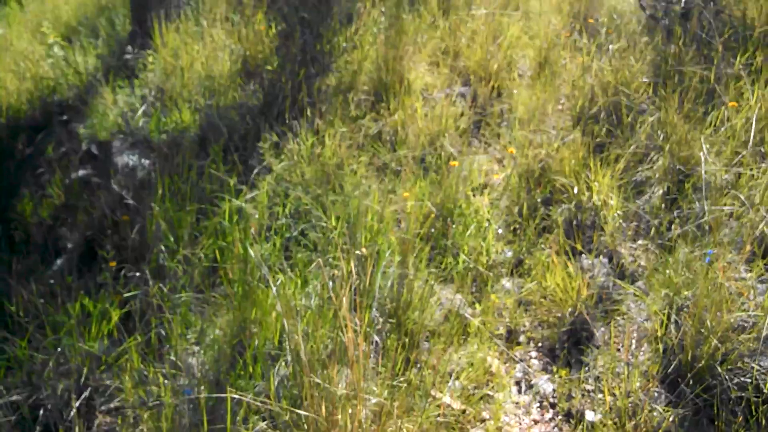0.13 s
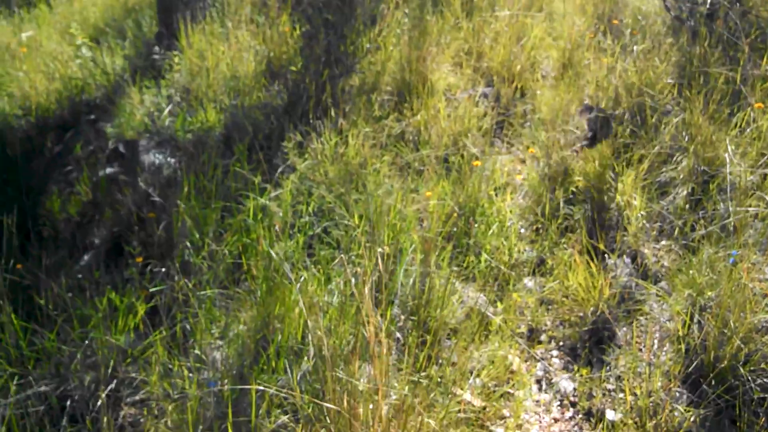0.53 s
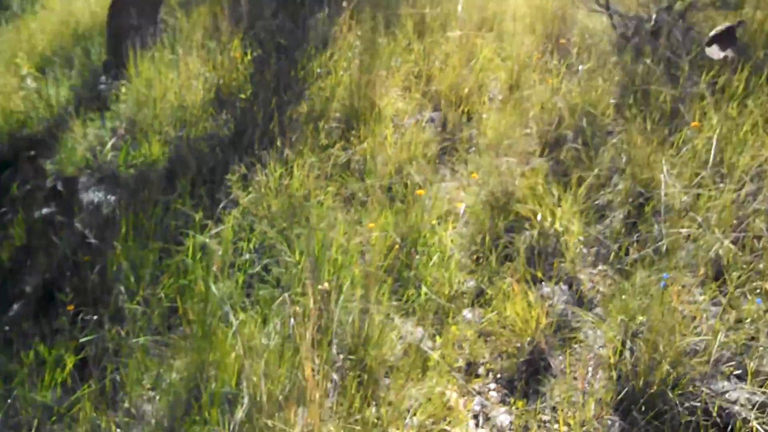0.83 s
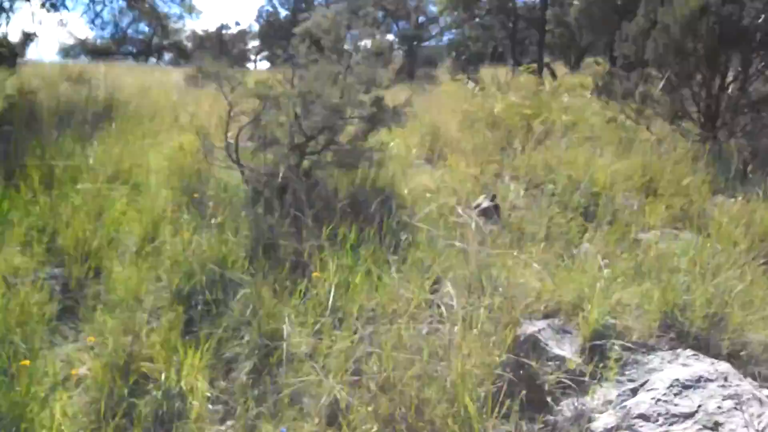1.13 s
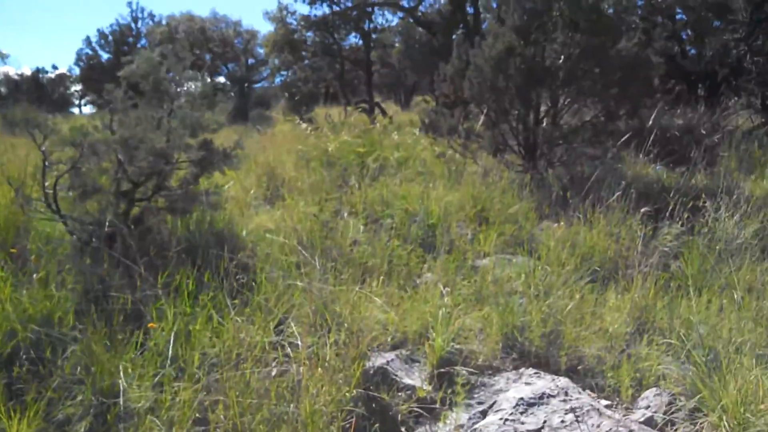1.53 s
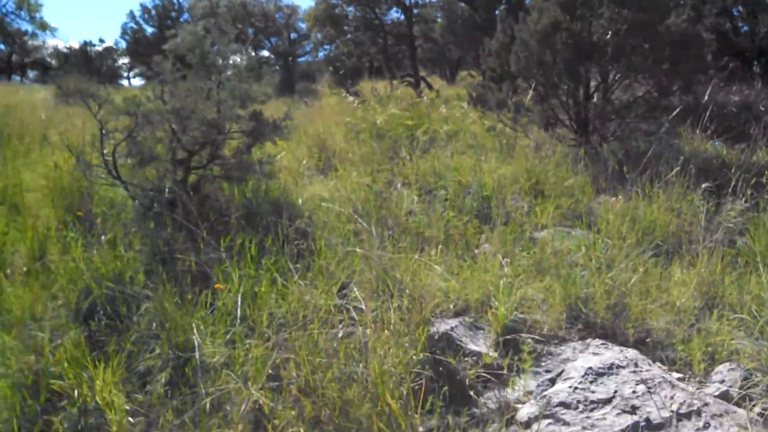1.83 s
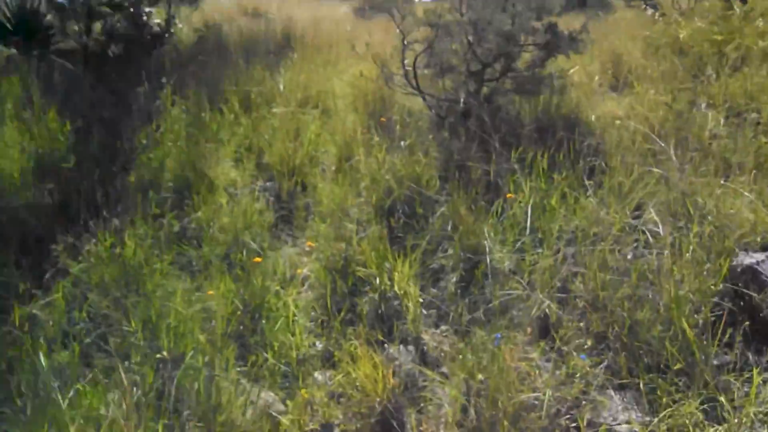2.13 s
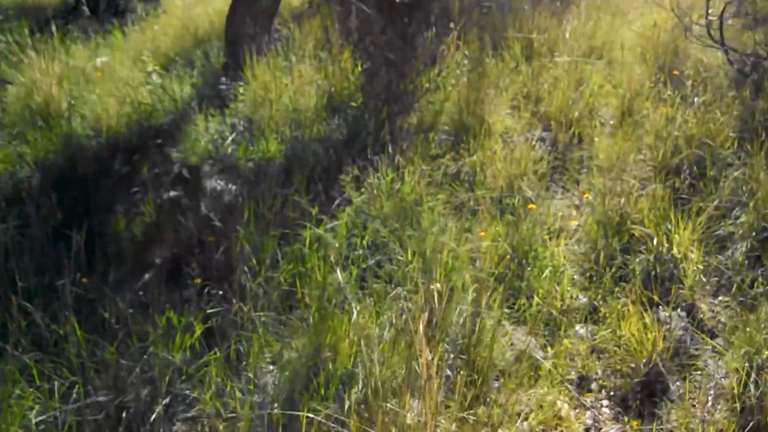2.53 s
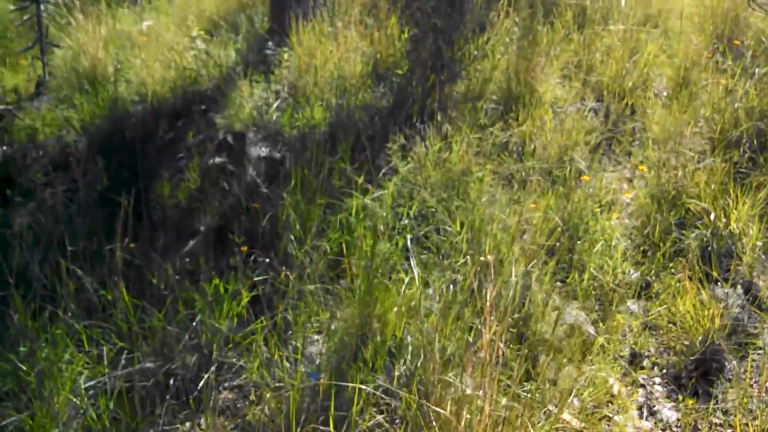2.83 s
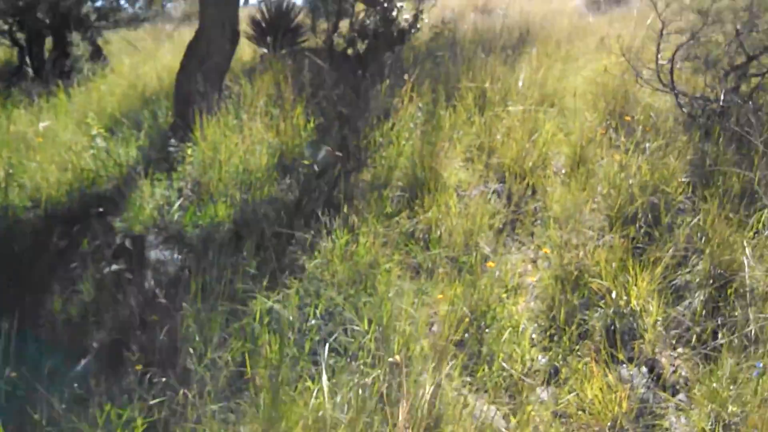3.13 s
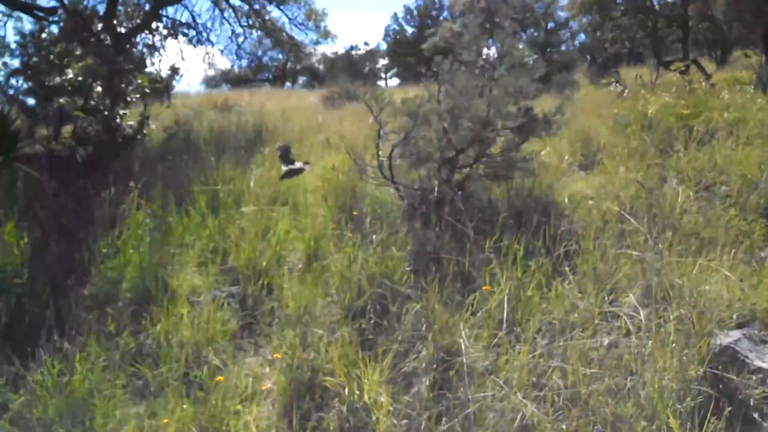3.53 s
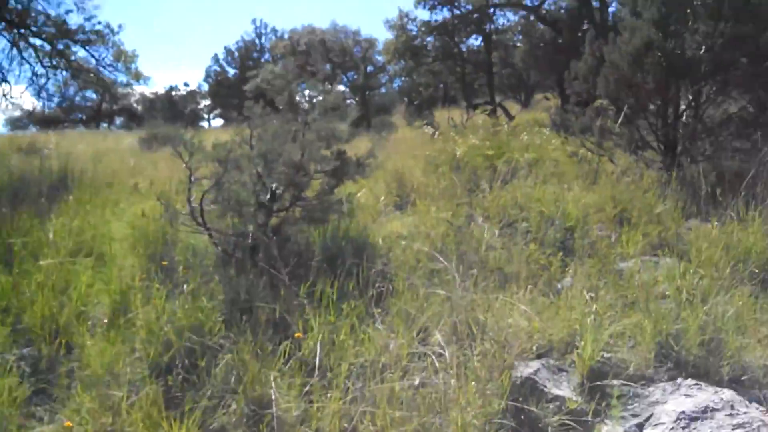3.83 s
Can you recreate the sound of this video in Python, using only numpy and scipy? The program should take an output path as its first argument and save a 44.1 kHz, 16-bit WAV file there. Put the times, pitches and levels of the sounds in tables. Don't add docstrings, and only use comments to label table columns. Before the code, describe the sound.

Rapid wing flapping thrashes dry grass twice, with young birds' falling whistles and low wind buffeting.

```python
import sys
import numpy as np
from scipy import signal
from scipy.fft import rfft, irfft, next_fast_len
from scipy.io import wavfile
from scipy.ndimage import uniform_filter1d, map_coordinates

SR = 44100
rng = np.random.default_rng(int(sys.argv[2]) if len(sys.argv) > 2 else 0)


def gain_from_db(level_db):
    decades = np.asarray(level_db, float) / 20
    return 10 ** decades


def inscribe(sig):
    pcm = np.round(np.clip(np.atleast_2d(sig).T, -1, 1) * 32767)
    wavfile.write(sys.argv[1], SR, pcm.astype(np.int16))


N = 176400


def unit(x):
    return x / np.sqrt(np.mean(x ** 2) + 1e-20)


def filtered(x, response):
    m = next_fast_len(N + 8192)
    return irfft(rfft(x, m) * response(np.fft.rfftfreq(m, 1 / SR)), m)[..., :N]


def noise(points, channels=2):
    f, db = np.transpose(points)
    white = rng.standard_normal((channels, N))
    return unit(filtered(white, lambda hz: gain_from_db(np.interp(np.log(hz + 1), np.log(f), db, left=-120))))


def wobble(knots_per_s):
    knots = rng.standard_normal(int(N * knots_per_s / SR) + 4)
    return map_coordinates(knots, [np.arange(N) * knots_per_s / SR])


def curve(rows):
    return np.interp(np.arange(N) / SR, *np.transpose(rows))


def add(track, start_s, sound):
    at = round(start_s * SR)
    track[..., at:at + sound.shape[-1]] += sound[..., :N - at]


SWOOP_RISE = 0.3


def swoop(hz, length_s, sag):
    u = np.arange(round(length_s * SR)) / (length_s * SR)
    rise = np.sin(np.pi / 2 * np.minimum(u / SWOOP_RISE, 1)) ** 2
    fall = np.cos(np.pi / 2 * np.maximum(u - SWOOP_RISE, 0) / (1 - SWOOP_RISE)) ** 2.2
    return rise * fall * np.sin(2 * np.pi * hz * length_s * (u - sag * u * u / 2))


# [f/Hz, level per Hz/dB]
HISS_SPECTRUM = [(150, 4), (1500, -16), (4000, -18.5), (6000, -24), (11000, -30), (15300, -15.5)]


def floor_hiss():
    return gain_from_db(-56) * noise(HISS_SPECTRUM)


# [t/s, level/dB]
WIND_STRENGTH = [(.28, -32), (.45, -27), (.6, -26), (1.25, -35), (1.6, -32), (1.72, -41), (1.85, -27.5),
                 (2.08, -44.5), (2.25, -23), (2.6, -35.5), (2.85, -25), (3.2, -32.5), (3.85, -32.5),
                 (4, -45.5)]
# [f/Hz, level per Hz/dB]
RUMBLE_SPECTRUM = [(25, -47), (45, 2), (70, 3.5), (120, -4), (200, -21.5), (400, -34.5), (900, -56.5)]


def wind_rumble():
    lumps = gain_from_db(2 * np.array([wobble(22.64), wobble(22.074)]))
    port_gain = gain_from_db([[-17], [0]])
    return gain_from_db(curve(WIND_STRENGTH)) * unit(lumps * noise(RUMBLE_SPECTRUM)) * port_gain


# [crest t/s, peak level/dB, f/Hz]
EDDY_HITS = [(.384, -15, 103), (0.45, -9, 98), (0.629, -16, 97), (.782, -24, 88), (1.488, -14, 100),
             (1.523, -14, 83), (1.59, -17, 89), (1.798, -16, 95), (1.817, -9, 86), (1.858, -13, 122),
             (1.963, -13.5, 332), (1.966, -3.5, 124), (2.175, -20.5, 88.5), (2.221, -17, 156),
             (2.235, -12, 208), (2.267, -15, 130), (2.286, -13, 105), (2.35, -18, 71), (2.39, -13.5, 112),
             (2.516, -21, 87), (2.534, -22, 207), (2.654, -21, 96), (2.789, -12.5, 88.5), (2.831, -12, 110),
             (2.866, -9.5, 88), (2.973, -14.5, 76)]


def wind_eddies():
    out = np.zeros((2, N))
    for crest_s, db, hz in EDDY_HITS:
        length_s = 2.32 / hz
        add(out[1], crest_s - SWOOP_RISE * length_s, gain_from_db(db) * swoop(hz, length_s, sag=0.22))
    return out


def hillside(x):
    t60_s, gap_s = 0.11, 0.004
    t = np.arange(SR // 4) / SR
    tail = rng.standard_normal((2, len(t))) * gain_from_db(-60 * t / t60_s) * (t > gap_s)
    return signal.fftconvolve(x, tail / np.linalg.norm(tail[0]), axes=1)[:, :N]


# [t/s, f/Hz]
EARLY_WHISTLES = [
    [(0.375, 2493), (0.399, 2330), (0.419, 2120), (0.459, 1830), (0.507, 1820), (0.525, 1850)],
    [(0.415, 2690), (0.459, 3020), (0.499, 3154), (0.511, 3470), (0.521, 3694), (0.595, 2970)],
    [(0.657, 2643), (0.71, 2506), (0.746, 2400), (0.784, 2520)],
    [(0.866, 3020), (0.906, 2653), (1.05, 2160), (1.068, 1820)],
    [(1.195, 2843), (1.207, 2710), (1.229, 2685), (1.241, 2494), (1.301, 2295), (1.335, 1890)],
    [(1.265, 2154), (1.279, 1838), (1.291, 1735), (1.363, 1844), (1.409, 1776), (1.451, 1710),
     (1.489, 1528)],
    [(1.441, 1944), (1.467, 2050), (1.485, 1984), (1.521, 1832), (1.552, 1515)],
    [(1.776, 2620), (1.81, 2333), (1.86, 2020), (1.932, 1970), (2.001, 2014), (2.049, 1596)],
    [(2.111, 1870), (2.189, 1790)],
]
LATE_WHISTLES = [
    [(2.299, 3000), (2.311, 2680), (2.329, 2700), (2.341, 3060), (2.369, 2840), (2.411, 2670),
     (2.468, 2310)],
    [(2.411, 1630), (2.43, 1740), (2.46, 1580), (2.52, 1600), (2.564, 1400)],
    [(2.532, 2620), (2.56, 2260), (2.62, 2080), (2.65, 1910)],
    [(2.656, 1780), (2.71, 1810), (2.758, 1910), (2.79, 2060), (2.81, 2040), (2.826, 2110), (2.86, 2050)],
    [(2.995, 2720), (3.019, 2650), (3.039, 2350), (3.077, 2200), (3.111, 1940), (3.131, 2010),
     (3.189, 1570)],
    [(3.306, 2720), (3.34, 2480), (3.36, 2090), (3.39, 2020), (3.418, 1870), (3.466, 1790), (3.498, 1610),
     (3.514, 1440)],
    [(3.47, 2570), (3.49, 2800), (3.514, 2900), (3.572, 2800), (3.624, 2530), (3.696, 1850), (3.753, 1650),
     (3.789, 1640), (3.819, 1430)],
]
FAR_WHISTLES = [
    [(1.59, 3610), (1.63, 3530), (1.665, 3270)],
    [(1.63, 3180), (1.66, 2800), (1.71, 2650)],
]
# [level/dB, swell start to end/dB, overtone level/dB, left lead/ms, final drop/dB]
VOICES = [(-43.5, -11, -10, 0.27, -30), (-38, -0.5, -17, 0.11, -38), (-36, -4.5, -15, 0.08, -36.5),
          (-36.5, -4, -18.5, 0.06, -60), (-39.5, 0.5, -15.5, 0.06, -23), (-46, 5, 0.5, 0.32, -3),
          (-39.5, -2, -18.5, 0.12, -18), (-43.5, -7, 2, -0.0933, 4.5), (-60, -6, -32, 0.055, -30),
          (-45, -5.5, -44, 0.098, -30), (-53.5, -3.5, 3.5, 0.23, 7.5), (-51, -14.5, -18, 0.15, -28),
          (-40, 9, -8, 0.22, -22), (-43, -10.5, 0, 0.17, -17), (-41.5, -1.5, -8, .18, -8),
          (-44, 5, -12, 0.22, -39), (-62, -10, -40, 0.11, -40), (-70, -6, -40, 0.18, -40)]
# [trill depth f/Hz, hoarseness/0-1]
SHAKES = [(10, .1), (20, .25), (50, .6), (15, .1), (15, .1), (10, .1), (15, .15), (85, .15), (5, .1),
          (8, .05), (10, .1), (10, .1), (45, .3), (50, .5), (40, .2), (15, .1), (5, .1), (5, .1)]


def chick_whistles():
    fade_s, attack_s, release_s = 0.006, 0.03, 0.022
    attack_db, release_db = -9, -7
    drop_s, drop_to_hz = 0.0276, 474
    trill_per_s, trill_crest_s = 35.5, 0.045
    out = np.zeros((2, N))
    quaver, flutter, rasp, shake = wobble(70), wobble(90), wobble(900), wobble(260)
    whistles = EARLY_WHISTLES + LATE_WHISTLES + FAR_WHISTLES
    for rows, voice, (trill_hz, hoarse) in zip(whistles, VOICES, SHAKES):
        db, swell_db, over_db, lead_ms, drop_db = voice
        s, hz = np.transpose(rows)
        first, last = s[0], s[-1]
        at = np.arange(round((first - fade_s) * SR), round((last + drop_s) * SR))
        t = at / SR
        age_s = t - t[0]
        fall = np.clip((t - last) / drop_s, 0, 1)

        pitch = uniform_filter1d(np.interp(t, s, hz), size=200)
        pitch = pitch + 9 * quaver[at] + 90 * hoarse * shake[at]
        trill = np.cos(2 * np.pi * trill_per_s * (t - last + trill_crest_s))
        pitch = pitch + trill_hz * age_s / (last - first) * trill
        pitch = pitch * (drop_to_hz / hz[-1]) ** (fall ** 0.595)

        corners_s = [first, first + attack_s, last - release_s, last]
        half_db = swell_db / 2
        shape_db = np.interp(t, corners_s, [attack_db - half_db, -half_db, half_db, release_db + half_db])
        gain = gain_from_db(db + shape_db + 1.8 * flutter[at] + drop_db * np.minimum(6 * fall, 1))
        gain = gain * np.clip(age_s / fade_s, 0, 1) * (1 - fall ** 3)
        gain = gain * (1 + rasp[at] * (fall > 0)) * (1 + hoarse * shake[::-1][at])

        lead_cycles = np.outer([0.5, -0.5], pitch) * lead_ms / 1000
        phase = 2 * np.pi * (np.cumsum(pitch) / SR + lead_cycles)
        throat_db = 6.5 * np.maximum(2 * pitch - 4020, 0) / 1000
        over = gain_from_db(over_db - throat_db) * (1 - fall) ** 4
        husk = gain_from_db(min(over_db, -4) - 2) * np.exp(-age_s / 0.09) * (1 + 0.5 * rasp[at])
        strands = np.sin(1.25 * phase) + 0.5 * np.sin(1.5 * phase)
        add(out, t[0], gain * (np.sin(phase) + over * np.sin(2 * phase) + husk * strands))
    return out


# [t/s, peak level/dB, f/Hz]
WING_WHOOPS = [
    (.284, -49.5, 580),
    (.587, -37, 830),
    (.697, -29, 832),
    (0.756, -23.5, 787),
    (1.161, -43.5, 645),
    (2.806, -40, 740),
    (3.01, -37.5, 752),
    (3.12, -41, 747),
    (3.877, -41.5, 770),
]


def wing_whoops():
    out = np.zeros((2, N))
    for s, db, hz in WING_WHOOPS:
        add(out, s, gain_from_db(db + 2.5) * swoop(hz, length_s=0.01, sag=0.22))
    return out


# [t/s, level/dB]
STIRRING = [(.46, -56), (.53, -42), (.8, -42), (.92, -59), (2.4, -64.5), (2.72, -58.5), (2.8, -43),
            (3.05, -47.5), (3.25, -57), (4, -59)]
# [t/s, length/s, level/dB]
WING_STROKES = [(0.509, 0.025, -43), (0.53, 0.032, -33), (0.602, 0.026, -36), (0.68, 0.0089, -28.5),
                (0.739, 0.0095, -37.5), (0.773, 0.051, -47), (0.864, 0.011, -40.5), (1.156, 0.006, -51),
                (1.34, 0.19, -52), (2.624, 0.0037, -49), (2.795, 0.04, -42), (2.859, .022, -35),
                (2.925, 0.023, -35.5), (2.97, 0.027, -36.5), (3.032, 0.014, -34.5), (3.1, 0.0047, -42.5),
                (3.154, 0.01, -48.5), (3.215, 0.0044, -38), (3.265, 0.0051, -41), (3.874, 0.018, -35.5),
                (3.966, 0.0071, -47.5)]
# [t/s, level/dB]
SNAPS = [(.536, -28), (.558, -24.5), (0.57, -27), (.626, -23.5), (0.682, -38), (0.69, -40), (0.743, -28),
         (.787, -40), (0.804, -33), (.815, -37), (.821, -44), (0.86, -39), (.936, -35), (1.161, -34),
         (2.432, -45), (2.801, -30), (2.817, -30.5), (2.866, -24), (2.879, -33), (2.937, -24),
         (2.992, -28.5), (3.048, -24), (3.106, -44), (3.156, -29), (3.281, -36), (3.691, -44.5),
         (3.766, -43), (3.985, -47)]


def stroke_envelopes():
    t = np.arange(N) / SR
    rise_s, fall_s, snap_s = 0.006, 0.005, 0.0011
    stalk_level = gain_from_db(curve(STIRRING) + 3.3 * wobble(30.135))
    air_level = gain_from_db(-1.5) * stalk_level
    for s, length_s, db in WING_STROKES:
        rise = np.clip((t - s) / rise_s + 0.5, 0, 1) ** 2
        stroke = gain_from_db(db) * rise * np.exp(-np.maximum(t - s - length_s, 0) / fall_s)
        stalk_level = stalk_level + stroke
        air_level = air_level + gain_from_db(-7) * stroke
    for s, db in SNAPS:
        snap = gain_from_db(db) * np.exp(-((t - s) / snap_s) ** 2)
        stalk_level = stalk_level + snap
        air_level = air_level + gain_from_db(-13) * snap
    return stalk_level, air_level


# [f/Hz, level per Hz/dB]
STALK_SPECTRUM = [(300, -13), (3500, -1.5), (6000, -14), (8500, 1), (10500, -10.5), (13000, 1.5),
                  (15300, 3.5)]
# [f/Hz, level per Hz/dB]
AIR_SPECTRUM = [(150, 12.5), (400, -3), (720, 1.3), (1050, -7.5), (2000, -9), (5000, -12.5)]


def wing_thrash():
    stalk_level, air_level = stroke_envelopes()
    crackle = unit(gain_from_db(1.5 * wobble(350) + 2.17 * wobble(90)))
    air = noise(AIR_SPECTRUM, channels=3)
    stalks = noise(STALK_SPECTRUM, channels=3)
    lead_s = -0.027e-3
    common = filtered(stalks[0], lambda hz: np.exp(2j * np.pi * np.outer([0.5, -0.5], hz) * lead_s))
    stalk_noise = unit(0.56 * common + stalks[1:]) * gain_from_db([[-1.2], [1.2]])
    air_noise = air[0] + 0.42 * air[1:]
    return crackle * (stalk_level * stalk_noise + air_level * air_noise)


def scene():
    calls = chick_whistles()
    background = floor_hiss() + wind_rumble() + wind_eddies()
    return background + calls + gain_from_db(-11) * hillside(calls) + wing_whoops() + wing_thrash()


def widened(x):
    cross_gain, lag_samples = 0.8, 16
    return x - cross_gain * np.pad(x[::-1], ((0, 0), (lag_samples, 0)))[:, :N]


def starved(x):
    hz, _, z = signal.stft(np.array([x[0] + x[1], x[0] - x[1]]) / 2, SR, nperseg=1024)
    band = np.arange(z.shape[1]) // 7 * 7
    frame = np.arange(z.shape[2]) // 3 * 3
    power = uniform_filter1d(np.abs(z) ** 2, size=7, axis=1)
    power = np.abs(uniform_filter1d(power, size=4, axis=2))
    whim_db = 3 * unit(uniform_filter1d(rng.standard_normal(z.shape[1:]), size=5, axis=1))
    masked = power < gain_from_db(2 * (-4.5 + whim_db)) * power[::-1]
    lost = masked & (power < np.median(power, axis=(0, 1)))
    lost = lost[:, np.minimum(band + 3, band[-1])][:, :, frame]
    lost = lost & (hz[:, None] > 1800)
    mid, side = signal.istft(z * ~lost, SR, nperseg=1024)[1][:, :N]
    return np.array([mid + side, mid - side])


def top_cut(x):
    return signal.sosfilt(signal.butter(12, 16820, fs=SR, output="sos"), x)


def record(dry):
    top_hz, start_s = 15550, 0.28
    wide = filtered(widened(dry), lambda hz: gain_from_db(-30 * np.maximum(hz - top_hz, 0) / 500))
    mix = starved(wide) * (np.arange(N) / SR > start_s)
    return top_cut(mix)


dry = scene()
out = record(dry)
inscribe(out)
```